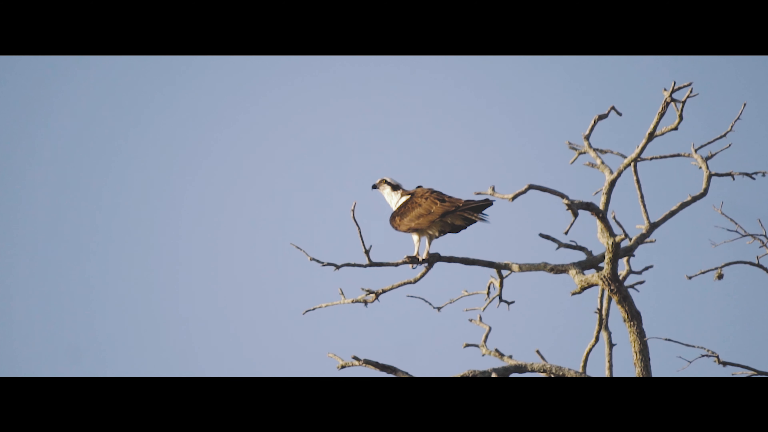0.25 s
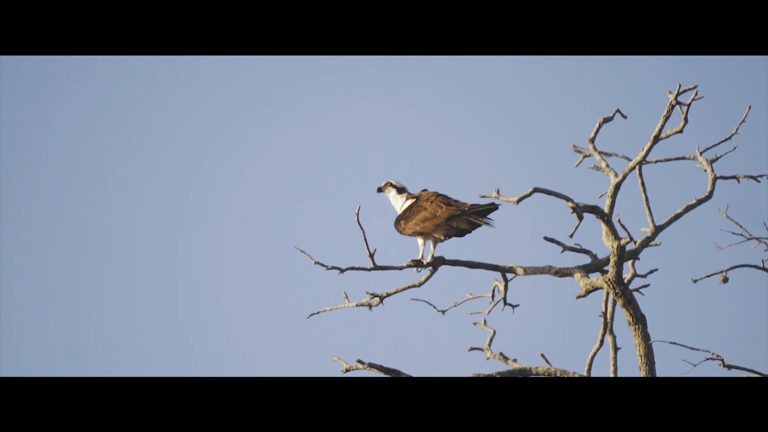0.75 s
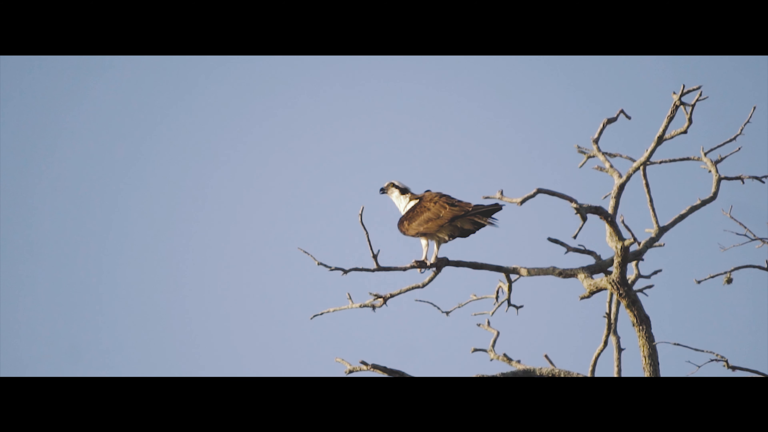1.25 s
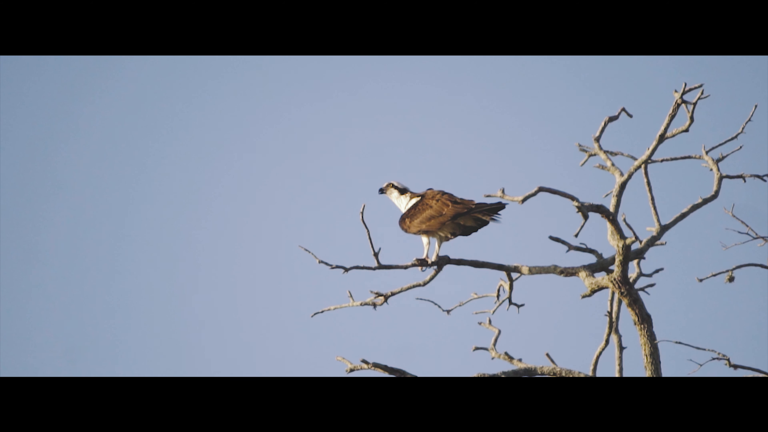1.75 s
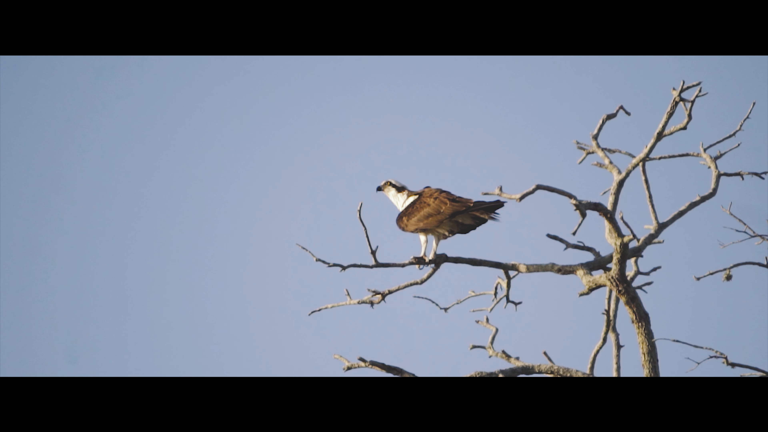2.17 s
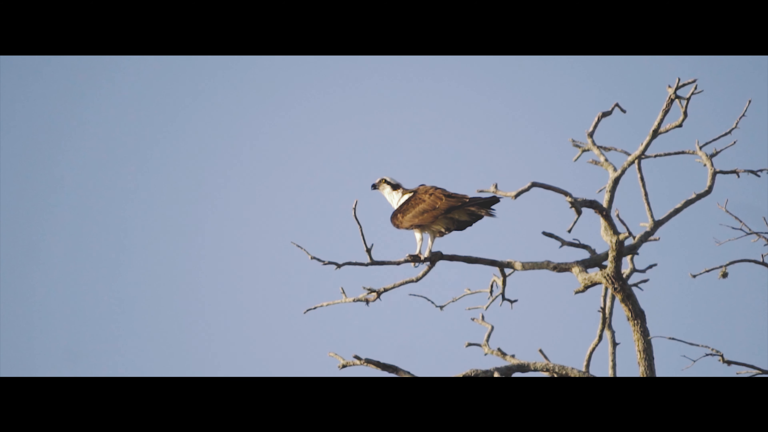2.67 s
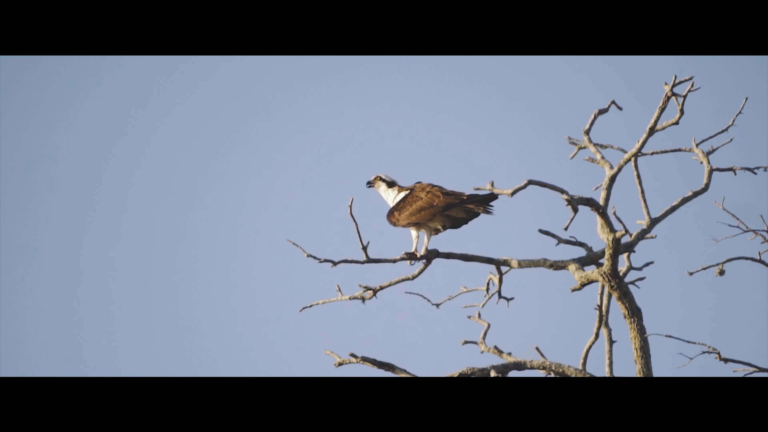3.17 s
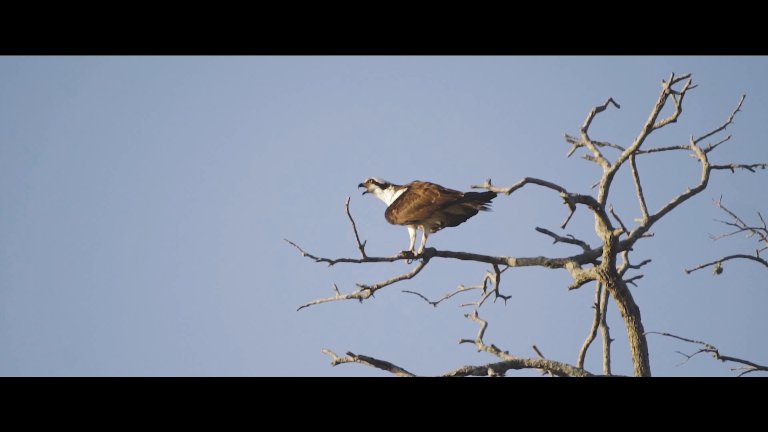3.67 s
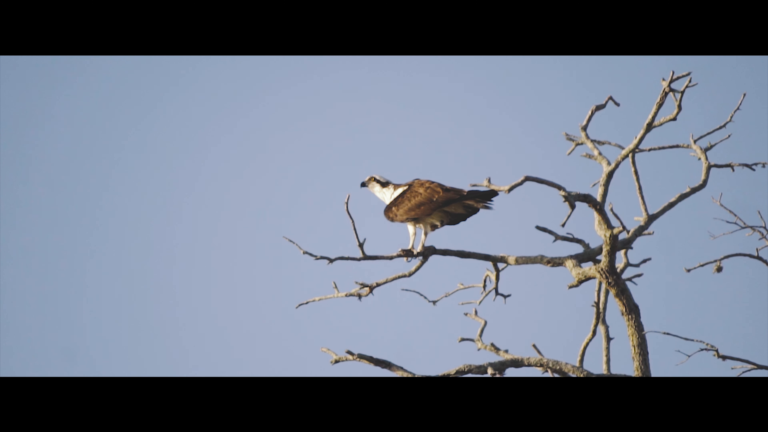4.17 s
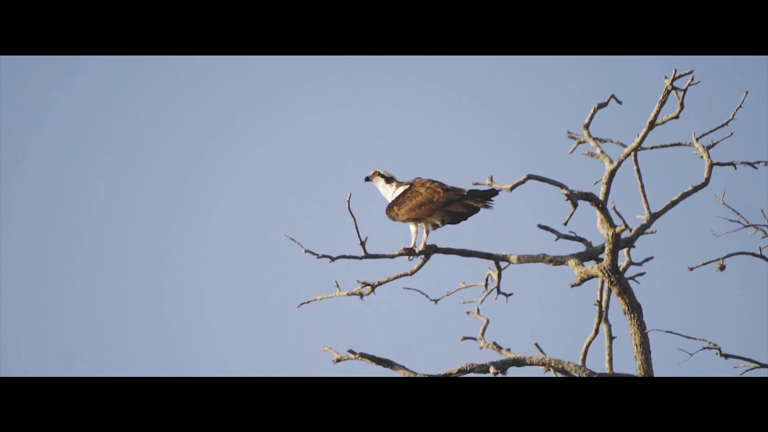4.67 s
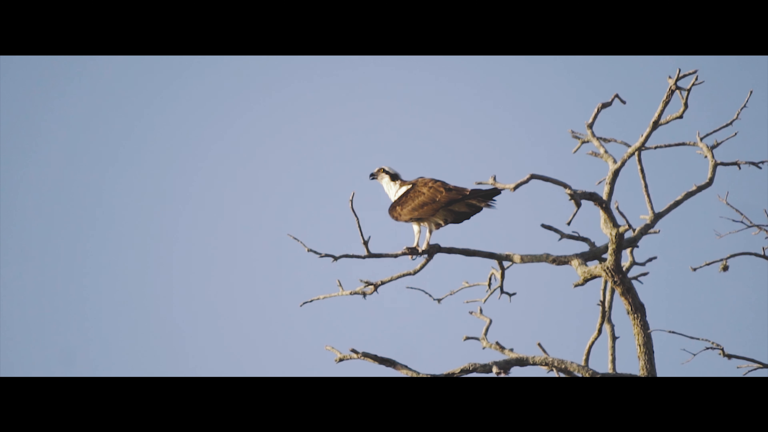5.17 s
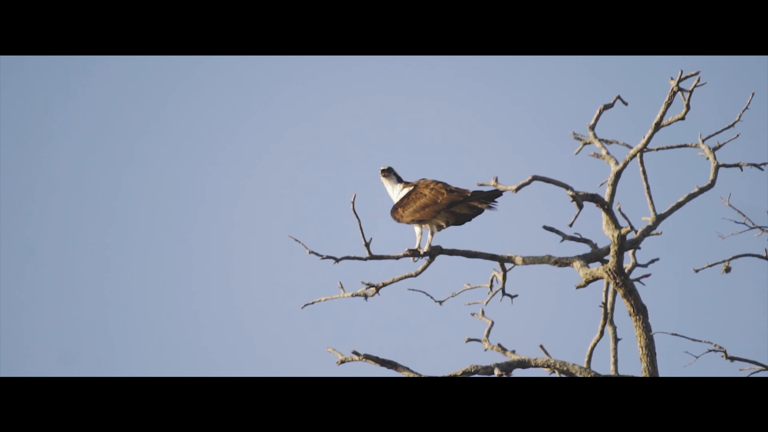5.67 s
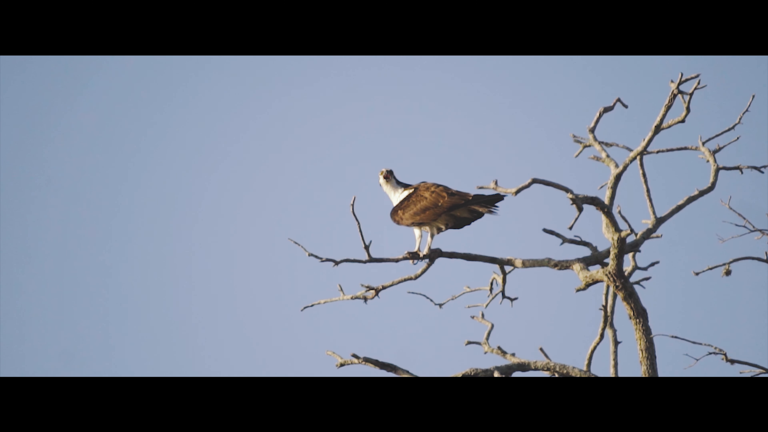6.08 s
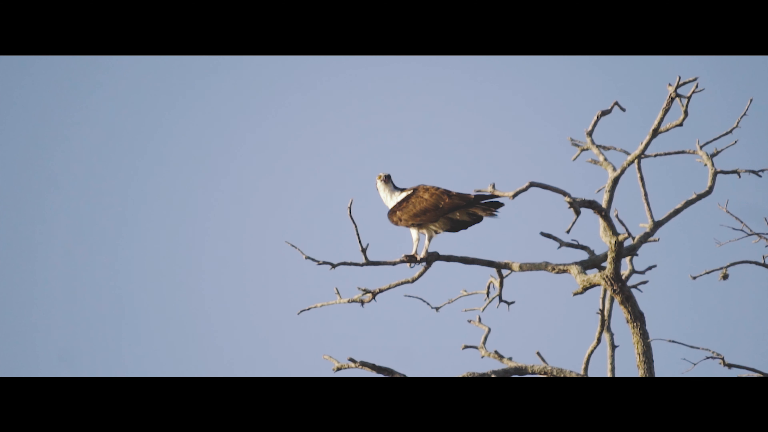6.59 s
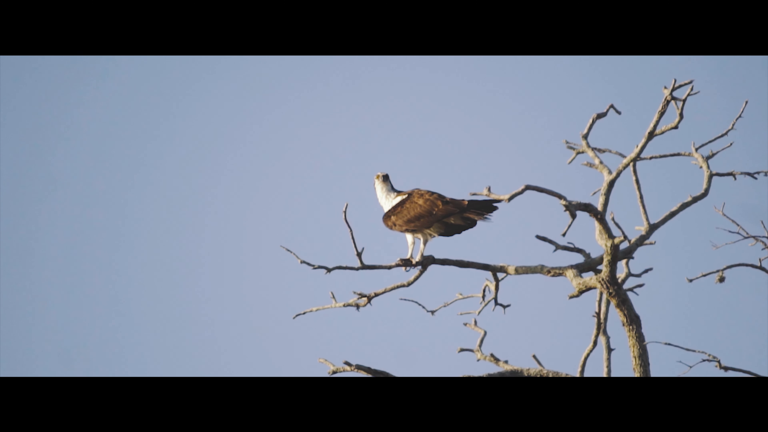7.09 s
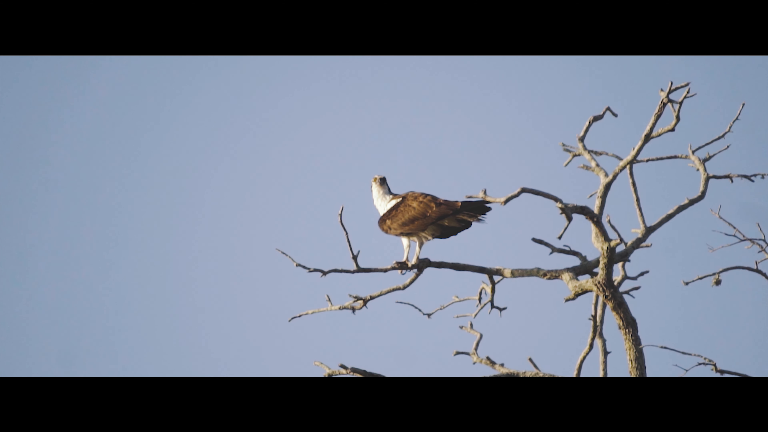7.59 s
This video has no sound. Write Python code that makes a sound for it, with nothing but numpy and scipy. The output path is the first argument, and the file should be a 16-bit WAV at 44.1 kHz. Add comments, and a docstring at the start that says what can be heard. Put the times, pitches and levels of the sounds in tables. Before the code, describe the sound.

Outdoors, a faint dark rush continues throughout, mostly bass with little hiss. Over it, a clear, close-sounding osprey whistles three times, each a quarter-second note gliding downward. The first is soft and low, the second higher and stronger, the third hardest, with a scratchy onset. Branches blur the calls and the woods ring on for about a second. Tiny hoarse bird yelps appear in the distance between whistles. Slightly muted extreme treble.

```python
"""An osprey, close and clear on a dead tree, gives three falling whistles, each higher and harder.
Each is a gliding tone with a weak octave and thin overtones; the last breaks out of a short rasp.
Branches scatter the calls and the woods ring on behind them, by convolution with a decaying noise response.
Other birds yelp and chatter far off, as arched tones and bands of noise.
Under all lies a low steady rush of distant wind or traffic, made of coloured noise."""
import sys
import numpy as np
from scipy import signal
from scipy.fft import rfft, irfft, next_fast_len
from scipy.io import wavfile

SR = 44100
rng = np.random.default_rng(int(sys.argv[2]) if len(sys.argv) > 2 else 0)


def transcribe(u):
    """Save the signal u as a 16-bit wav file named by the first command-line argument.

    u: samples, shape (n,) or (channels, n), limited to [-1, 1]; the rate is SR.
    q: integer samples, one column per channel.
    """
    v = np.clip(np.atleast_2d(u).T, -1, 1)
    q = np.round(v * 32767).astype(np.int16)
    wavfile.write(sys.argv[1], SR, q)


N = 344862
T = np.arange(N) / SR  # seconds

ONSET_S, RELEASE_S = 0.003, 0.033
# the break: time scales of the pitch drop and of the swell into the loud note; full strain speeds the drop by this share
BREAK_S, SWELL_S, STRAIN_SNAP = 0.0049, 0.0045, 0.6
# strain starts the lead-in flat and bright, both easing over RASP_RISE_S; the rasp dies out at the break
RASP_LOCK_S, RASP_FLAT, RASP_RISE_S, RASP_BRIGHT_DB = 0.028, 0.27, 0.018, 32
# overtone slope in dB per octave, and what full strain adds: a lasting part, and a bite that fades after the break
SLOPE_DB, STRAIN_SLOPE_DB, BITE_DB, BITE_S = -32, 16.5, 10, 0.013

# The whistles: a thin lead-in breaks into a loud note that glides to its end.
# (start t/s, break t/s, end t/s, lead-in f/Hz at the break, fall of the lead-in [Hz/s],
#  note f/Hz at the break, end f/Hz, bow of the glide [0-1], lead-in level/dB, delay of the swell t/s,
#  peak level/dB, place of the peak [0-1 of the note], sag level/dB a whole note away from the peak,
#  octave level/dB re fundamental, overtone level/dB re fundamental, overtone lift level/dB at both ends, strain [0-1])
OSPREY_WHISTLES = [(1.681, 1.702, 1.897, 1150, 3610, 1059, 826, 0.2, -33.5, 0.002, -16.5, 0.39, 39, -20.5, -40, 11.5, 0),
                   (3.87, 3.894, 4.135, 1880, 8500, 1402, 925, 0.66, -43, 0.01, -12, 0.48, 33.5, -20.5, -35, -3.5, 0.05),
                   (6.446, 6.486, 6.698, 1840, 2500, 1477, 1020, 0.1, -23.5, 0.00086, -9.5, 0.3, 13.5, -18, -34, 8.5, 0.77)]


def osprey(rasp_hiss_db=-23, soft_hiss_db=-56, strain_hiss_db=4):
    """Falling whistles close by: each swells and sags in one arch; strain adds rasp, overtones and hiss."""
    calls = np.zeros(N)
    hiss_colour = [(1300, -30), (2200, -3), (3400, -1), (4300, -3), (5300, 1), (6100, -18),
                   (8000, -13), (9500, -22)]  # f/Hz, level/dB
    air = noise(lambda f: colour(f, hiss_colour))
    for (start, drop, end, lead_hz, lead_fall, top_hz, end_hz, bow, lead_db, delay, peak_db, peak_at, sag_db,
         octave_db, upper_db, edge_db, strain) in OSPREY_WHISTLES:
        on = (T > start - ONSET_S) & (T < end + RELEASE_S)
        t = T[on]
        along = np.minimum((t - drop) / (end - drop), 1)
        rasp = strain * np.clip((drop - t) / RASP_LOCK_S, 0, 1)
        flat = strain * np.exp(-np.maximum(t - start, 0) / RASP_RISE_S)

        # pitch: the lead-in breaks into a glide that flattens towards its end
        lead = (lead_hz + lead_fall * (drop - t)) * (1 - RASP_FLAT * flat)
        glide = end_hz + (top_hz - end_hz) * (1 - along) * (1 - bow * along)
        broken = step(t - drop, BREAK_S / (1 + STRAIN_SNAP * strain))
        hz = lead + (glide - lead) * broken

        # level: faint until the break, then one arch; strain moves strength from fundamental to overtones
        bright_db = RASP_BRIGHT_DB * flat
        swell = step(t - drop - delay, SWELL_S)
        lead_level = undb(lead_db - bright_db / 2)
        note_level = undb(peak_db - sag_db * (along - peak_at) ** 2)
        level = (1 - swell) * lead_level + swell * note_level
        gate = np.interp(t, [start - ONSET_S, start, end, end + RELEASE_S], [0, 1, 1, 0])

        # timbre: the overtone lift vanishes in the middle of the note
        edge = np.minimum((2 * along - 1) ** 2, 1)
        overtones_db = upper_db + edge_db * edge + bright_db / 2
        soft_hiss = undb(soft_hiss_db + strain_hiss_db * strain)
        hiss = air[on] * (soft_hiss + undb(rasp_hiss_db) * rasp ** 2)
        bite = np.exp(-np.maximum(t - drop, 0) / BITE_S)
        slope_db = SLOPE_DB + strain * (STRAIN_SLOPE_DB + BITE_DB * bite)
        bend, strength = syrinx(on, rasp)
        tone = voice(hz * bend, octave_db + bright_db, overtones_db, slope_db, hiss)
        calls[on] += gate * level * strength * tone
    return calls


def syrinx(on, rasp, rattle_hz=285, rattle_scatter=0.12, rattle_bend=0.032, rattle_swing=1.0,
           rasp_jitter=0.088, jitter=0.003, shimmer_db=1.2):
    """Factors on pitch and strength: a fine tremor, and in the rasp a slower second vibration of the syrinx."""
    rattle_rate = rattle_hz * (1 + rattle_scatter * walk(90)[on])
    rattle = rasp * np.sin(2 * np.pi * np.cumsum(rattle_rate) / SR)
    bend = 1 + jitter * walk(74)[on] + rattle_bend * rattle + rasp_jitter * rasp * walk(500)[on]
    strength = (1 + rattle_swing * rattle) * undb(shimmer_db * walk(40)[on])
    return bend, strength


# the octave flares as it slides through the resonance of the open beak, and is weaker while above it
BEAK_HZ, BEAK_WIDTH_HZ, BEAK_DB, ABOVE_BEAK_DB = 2300, 152, 6.5, -4.5

# Colour that throat and open beak give the upper overtones: (f/Hz, level/dB)
THROAT_COLOUR = [(2500, 2), (3400, 9.5), (4300, 6), (5100, 12), (6200, -6), (7200, 5), (8300, 0.5),
                 (9200, 1.5), (9700, -15)]


def voice(hz, octave_db, upper_db, slope_db, hiss, flicker_db=2):
    """A strong fundamental, its octave shaped by the beak, and thin overtones that fall by slope_db an octave."""
    phase = 2 * np.pi * np.cumsum(hz) / SR
    beak_db = BEAK_DB * np.exp(-.5 * ((hz * 2 - BEAK_HZ) / BEAK_WIDTH_HZ) ** 2)
    beak_db += ABOVE_BEAK_DB * step(hz * 2 - BEAK_HZ - 2 * BEAK_WIDTH_HZ, BEAK_WIDTH_HZ / 2)
    octave = undb(octave_db + beak_db) * np.sin(2 * phase)
    order = np.arange(3, 11)[:, None]
    weights = colour(order * hz, THROAT_COLOUR) * undb(slope_db * np.log2(order))
    # each overtone flickers on its own, with its own stretch of the walk
    flicker = undb(flicker_db * walk(45)[:weights.size].reshape(weights.shape))
    upper = np.sum(weights * flicker * np.sin(order * phase), axis=0)
    upper = upper / np.linalg.norm(weights, axis=0)
    # air hisses through the syrinx once a cycle
    air = hiss * (1 + np.cos(phase))
    return np.sin(phase) + octave + undb(upper_db) * upper + air


def reflection(x, delay_s=0.01059, gain_db=-8, dull_hz=1150):
    """One close reflection, perhaps off the ground, that keeps only the lowest tones and carves dips in the glides."""
    dull = lowpass(x, dull_hz, order=3)
    return undb(gain_db) * np.interp(T - delay_s, T, dull)


# Far birds, each yelp an arch of pitch:
# (top t/s, length t/s, top f/Hz, sag at the ends [octaves], level/dB, hoarseness [0-1])
FAR_YELPS = [(0.704, 0.19, 2210, 0.28, -64.5, .9), (1.104, 0.07, 2064, .8, -45.5, 0.9),
             (1.118, 0.028, 1382, .1, -53, .5), (3.285, 0.052, 2216, 0.72, -50, .35),
             (3.305, .2, 2290, 0.034, -64, .8), (3.767, 0.039, 1207, .05, -54, .2),
             (4.703, 0.027, 2710, 0.49, -64, .4), (6.975, 0.035, 2290, 0.54, -45.5, 0.7),
             (7.083, .05, 2380, .6, -51.5, 0.52)]


def far_yelps(buzz_hz=290):
    """Short yelps far off that rise and fall in pitch; a buzz in level and a waver in pitch make them hoarse."""
    yelps, waver = np.zeros(N), walk(370)
    buzz = np.sin(2 * np.pi * buzz_hz * T + walk(60))
    for top_s, length, top_hz, sag, db, hoarse in FAR_YELPS:
        arch = np.minimum((2 * (T - top_s) / length) ** 2, 1)
        hz = top_hz * 2 ** (-sag * arch) * (1 + 0.04 * hoarse * waver)
        tone = np.sin(2 * np.pi * np.cumsum(hz) / SR)
        yelps += undb(db) * hump(top_s, length) * (1 + hoarse * buzz) * tone
    return yelps


# Faint far-off chatter: (middle t/s, length t/s, centre f/Hz, level/dB)
FAR_CHATTER = [(2.162, 0.046, 2460, -70), (2.906, 0.49, 2470, -70), (3.418, 0.53, 2500, -71),
               (5.443, .5, 2700, -74)]


def far_chatter():
    """Blurred patches of chatter: bands of noise that swell and fade."""
    chatter = np.zeros(N)
    for middle, length, hz, db in FAR_CHATTER:
        chatter += undb(db) * hump(middle, length) * band(hz, octaves=0.27)
    return chatter


# Colour of what the woods send back to the microphone: (f/Hz, level/dB)
WOODS_COLOUR = [(950, -2.5), (1300, -2.5), (1550, -4.5), (1850, 1.5), (2600, 3.5), (3150, -3.5), (4100, 3),
                (5200, 1)]


def woods(near_db=-14.0, near_s=0.024, echoes_per_s=350, far_db=-19.0, build_s=0.087,
          low_t60=1.86, mid_t60=1.67, high_t60=1.0, mid_db=-2, high_db=1):
    """Outdoor response: quick scatter from branches and ground, then a long tail from the woods."""
    t = T[:2 * SR]
    near, far = rng.standard_normal((2, len(t)))
    # branches return separate echoes
    struck = rng.random(len(t)) < echoes_per_s / SR
    near = near * struck * (t / near_s) ** 2 * np.exp(-t / near_s)
    far = far * (1 - np.exp(-t / build_s))
    low, below = lowpass(far, 1600, order=4), lowpass(far, 2900, order=4)
    # leaves and air swallow the treble first; each t60 is the time in seconds to fall by 60 dB
    low_fade, mid_fade, high_fade = (np.exp(-np.log(1000) * t / t60) for t60 in (low_t60, mid_t60, high_t60))
    tail = low * low_fade
    tail += undb(mid_db) * (below - low) * mid_fade
    tail += undb(high_db) * (far - below) * high_fade
    scatter = undb(near_db) * near / np.linalg.norm(near)
    ring = undb(far_db) * tail / np.linalg.norm(far * low_fade)
    spectrum = rfft(scatter + ring)
    return irfft(spectrum * colour(np.linspace(0, SR / 2, len(spectrum)), WOODS_COLOUR))


# the rumble holds its level, then grows
RUMBLE_DB, GROWS_FROM_S, GROWTH_DB_PER_S = -0.9, 5.13, 3

# Colour of the distant rush: (f/Hz, relative level/dB)
RUSH_COLOUR = [(12, -29), (20, 4), (55, -5), (76, -11.5), (102, -10), (180, -15.5), (251, -21), (317, -20),
               (492, -24), (575, -25), (1180, -37), (1940, -45.5), (2640, -49), (2930, -52), (8440, -62),
               (9600, -66.5), (12500, -104), (21100, -120)]


def rush(level_db=-41.0, deep_hz=130, rumble_hz=290, flutter_db=-0.5, gust_db=0.3):
    """Dark distant noise: gusty deep bass, a rumble that flutters and later grows, a smooth hiss."""
    air = noise(lambda f: colour(f, RUSH_COLOUR) * f ** 2 / (f ** 2 + 20 ** 2))
    deep, below = lowpass(air, deep_hz, order=3), lowpass(air, rumble_hz, order=3)
    swell_db = RUMBLE_DB + GROWTH_DB_PER_S * np.maximum(T - GROWS_FROM_S, 0)
    rumble = (below - deep) * undb(swell_db + flutter_db * walk(0.93))
    gusty = deep * undb(gust_db * walk(2.3))
    return undb(level_db) * (gusty + rumble + air - below)


def undb(db):
    """Decibels to gain."""
    return 10 ** (np.asarray(db) / 20)


def unit(x):
    """Scale to rms 1."""
    return x / np.sqrt(np.mean(x ** 2))


def colour(hz, points):
    """Gain at these frequencies of a spectrum given as (f/Hz, level/dB) points."""
    f, db = np.transpose(points)
    return undb(np.interp(np.log(hz + 1), np.log(f), db))


def noise(shape):
    """Noise of rms 1 whose spectrum is shape(f/Hz)."""
    size = next_fast_len(N, real=True)
    hz = np.arange(size // 2 + 1) * SR / size
    spectrum = rfft(rng.standard_normal(size)) * shape(hz)
    return unit(irfft(spectrum, size)[:N])


def band(hz, octaves):
    """Noise in a bell-shaped band."""
    return noise(lambda f: np.exp(-.5 * (np.log2((f + 1) / hz) / octaves) ** 2))


def walk(rate):
    """Smooth random wander of rms 1, moving about rate times a second."""
    return noise(lambda f: np.exp(-.5 * (f / rate) ** 2))


def hump(middle, length):
    """A smooth swell from silence to 1 and back."""
    return np.cos(np.pi * np.clip((T - middle) / length, -.5, .5))


def step(t, width):
    """A smooth step from 0 to 1 around t = 0."""
    return .5 + .5 * np.tanh(.5 * t / width)


def lowpass(x, hz, order):
    """Keep what lies below hz, without delay."""
    return signal.sosfiltfilt(signal.butter(order, hz, fs=SR, output="sos"), x)


def scene(far_wet_db=6):
    """The osprey close and clear, the far birds with more echo than the osprey, the rush under all."""
    bird = osprey()
    others = far_yelps() + far_chatter()
    echoes = signal.fftconvolve(bird + undb(far_wet_db) * others, woods())[:N]
    return (bird + reflection(bird) + others + echoes + rush())[None]


def record(dry, top_hz=9650):
    """The recorder cuts the top steeply."""
    return signal.sosfilt(signal.ellip(10, .2, 70, top_hz, fs=SR, output="sos"), dry)


dry = scene()
out = record(dry)
transcribe(out)
```